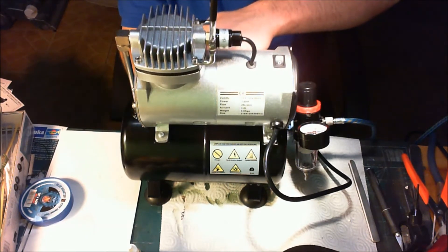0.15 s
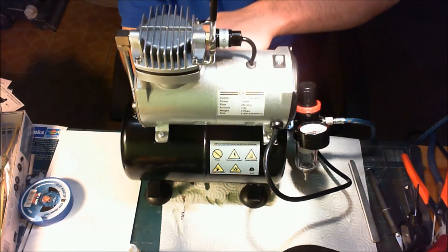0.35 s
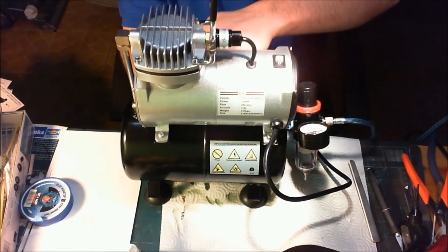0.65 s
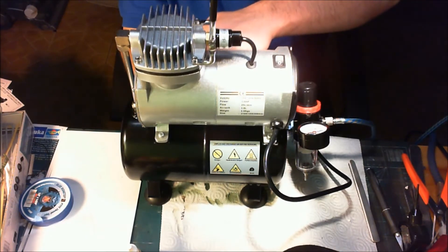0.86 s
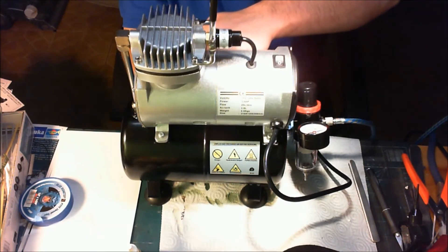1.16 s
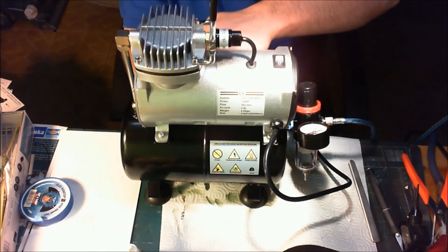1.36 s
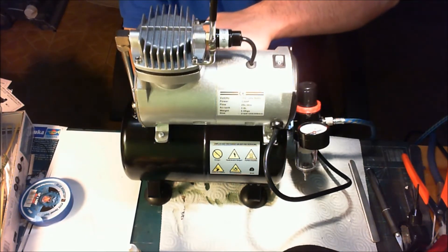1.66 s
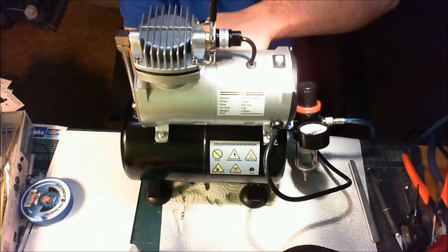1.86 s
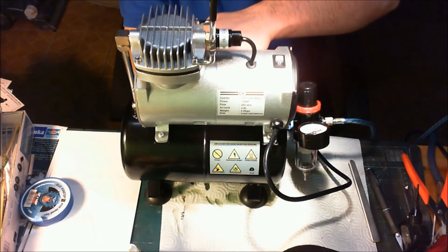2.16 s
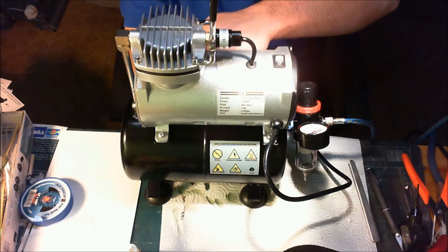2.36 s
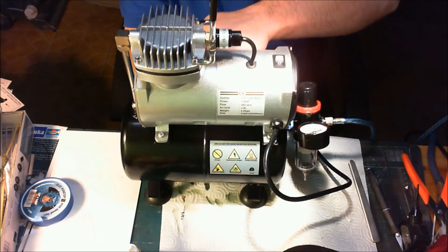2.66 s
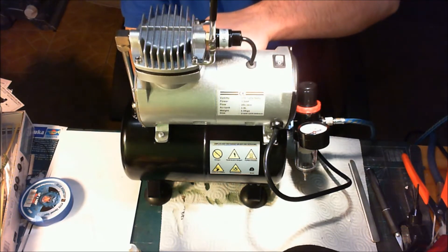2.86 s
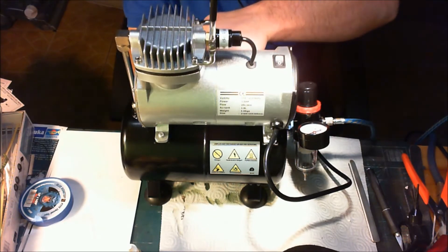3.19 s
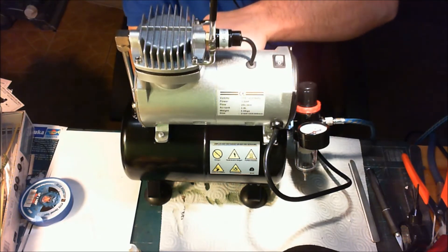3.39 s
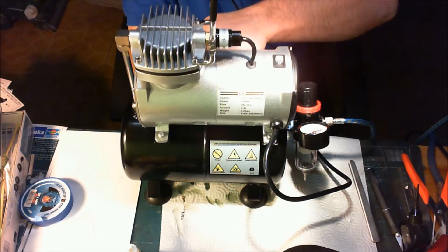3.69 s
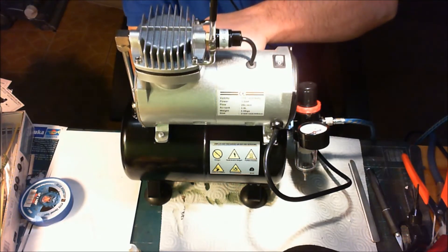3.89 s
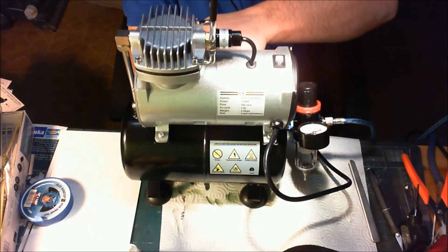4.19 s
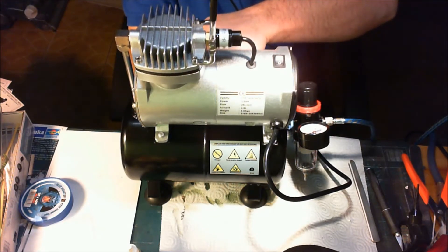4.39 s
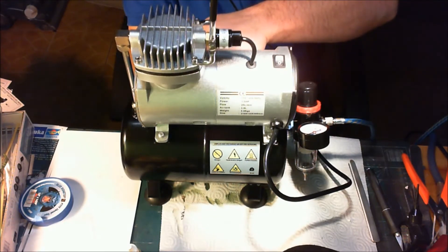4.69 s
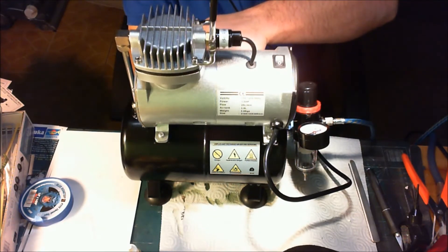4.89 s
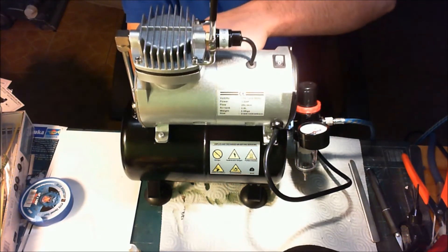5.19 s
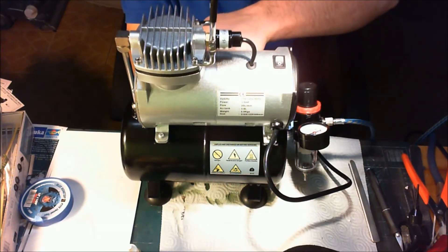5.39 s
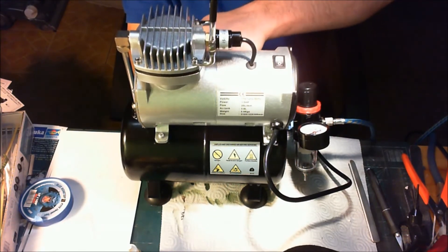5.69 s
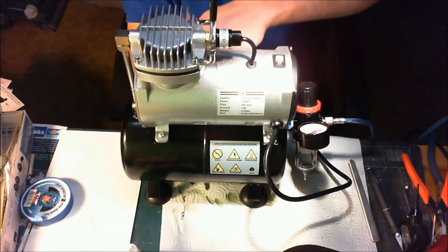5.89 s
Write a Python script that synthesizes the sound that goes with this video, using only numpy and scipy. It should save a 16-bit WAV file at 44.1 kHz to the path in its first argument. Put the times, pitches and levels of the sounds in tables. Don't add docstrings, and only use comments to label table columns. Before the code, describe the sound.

Harsh compressed air hiss bleeds from a small tank, thins and fades; a humming fan rises, a thin whistling leak, then metal clicks and two puffs.

```python
import sys
import numpy as np
from scipy import signal
from scipy.fft import rfft, irfft
from scipy.io import wavfile
from scipy.ndimage import uniform_filter1d

SR = 44100
rng = np.random.default_rng(int(sys.argv[2]) if len(sys.argv) > 2 else 0)


def put_to_file(sound):
    columns = np.atleast_2d(sound).T
    safe = np.clip(columns, -1, 1)
    whole_steps = np.round(safe * 32767)
    wavfile.write(sys.argv[1], SR, whole_steps.astype(np.int16))


def boost(x):
    u = np.asarray(x, float) / 20
    return 10 ** u


N = 266628
T = np.arange(N) / SR
HZ = np.fft.rfftfreq(N, 1 / SR) + 1e-3


def level(x, db):
    return x * boost(db) / np.sqrt(np.mean(x ** 2))


def after(s):
    return np.maximum(T - s, 0)


def walk(rate):
    k = int(SR / rate)
    steps = np.repeat(rng.standard_normal(N // k + 1), k)
    return 1.258 * uniform_filter1d(uniform_filter1d(steps, k), k)[:N]


def noise(colour, peaks=(), tilt_db=0.):
    hz, db = np.transpose(colour)
    shape = np.interp(np.log(HZ), np.log(hz), db, left=-90, right=-90)
    shape = shape + tilt_db * np.log2(HZ / 2000)
    for centre, width, lift_db in peaks:
        shape = shape + lift_db / (1 + (2 * (HZ - centre) / width) ** 2)
    return rfft(rng.standard_normal(N)) * boost(shape)


def band(spectrum, lo, hi):
    loss = np.sqrt((1 + (lo / HZ) ** 12) * (1 + (HZ / hi) ** 12))
    return level(irfft(spectrum / loss, N), 0)


def opening():
    shut_db, open_db, opens_s, tau_s = -30.5, -0.03, 3.428, 0.35
    return open_db + (shut_db - open_db) * np.exp(-after(opens_s) / tau_s)


def bleed():
    # t/s, level/dB
    flow = [(0, -37.5), (.35, -41), (.9, -43), (1.6, -45), (2.1, -48.5), (2.5, -51.5), (2.85, -56.5),
            (3.1, -62.5), (3.5, -69)]
    # f/Hz, density/dB per Hz
    jet_colour = [(30, -37), (200, -30.5), (386, -16.5), (498, -21), (666, -2.5), (743, -4.5), (959, -8),
                  (1220, -15), (1950, -8), (4680, -11.5), (7520, -9), (11700, -12.5), (12100, -14.5),
                  (15760, -15)]
    # f/Hz, width/Hz, lift/dB
    tank_modes = [(1227, 30, 11), (2010, 130, 2.5), (2870, 190, 3), (3290, 170, -9.5), (3710, 690, 5.5),
                  (4190, 220, -6), (5100, 180, 3.5), (5480, 113, 6), (6000, 250, 6), (6800, 91, -5),
                  (7060, 93, 7), (7370, 74, 3.5), (7560, 140, 6), (7870, 61, 7.5), (8330, 67, 4.5),
                  (8660, 150, -1), (11200, 220, 4.5), (13800, 500, 0)]
    # f/Hz, density/dB per Hz
    cavity_colour = [(500, -20), (580, -19), (635, -7), (668, 2.5), (715, -10), (785, -11), (860, -1.5),
                     (945, -0.5), (1010, -1), (1065, -14), (1095, -3.5), (1125, -8), (1200, -18.5),
                     (1500, -13.5)]
    # low f/Hz, high f/Hz, share/dB, lets go t/s, drop/dB
    drone_parts = [
        (400, 750, -5.5, 3.1, -9),
        (804, 2400, -3.5, 2.05, -12),
    ]
    mid_hz, high_hz, top_hz = 1300, 4500, 10000
    choked_s, unchoke_s = 1.36, 0.27
    lock_s = .22

    flow_db = np.interp(T, *np.transpose(flow), right=-120) + 1.07 * walk(5.23)
    subsonic = 1 / (1 + np.exp((choked_s - T) / unchoke_s))
    mid_db = -4 - 10 * subsonic
    top_db = -7.5 - 3.5 * subsonic

    cavity = noise(cavity_colour)
    drone = 0
    for lo, hi, share_db, s, drop_db in drone_parts:
        part_db = share_db + drop_db * np.clip(after(s) / 0.1, 0, 1)
        drone = drone + band(cavity, lo, hi) * boost(part_db)
    drone_db = -.5 - 7 * np.exp(-T / lock_s) - 2.07 * T

    jet = noise(jet_colour, tank_modes)
    hiss = drone * boost(drone_db + 1.8 * walk(9))
    hiss += band(jet, 150, 556) * boost(mid_db - 12.0 + 1.0 * walk(8.7))
    hiss += band(jet, mid_hz, high_hz) * boost(mid_db + 1.1 * walk(12))
    hiss += band(jet, high_hz, top_hz) * boost(-3.0 + 0.37 * walk(31.24))
    hiss += band(jet, top_hz, 19500) * boost(top_db + .4 * walk(7.9))

    edge_db = -43 - 21 * after(1.43) + 0.56 * walk(16.3)
    edge_tone = band(noise(jet_colour, tank_modes), 7450, 7640) * boost(edge_db)
    return boost(flow_db) * hiss + edge_tone


def leak():
    # f/Hz, density/dB per Hz
    leak_colour = [(1800, -13.5), (2600, -9.5), (3300, -14), (4600, -9), (6500, -8.5), (7500, -4.5),
                   (8500, 1), (9300, -3.5), (10000, -10), (12000, -20.5), (15760, -22)]
    # f/Hz, width/Hz, lift/dB
    valve_modes = [(3330, 130, -9), (3790, 810, 12), (4230, 200, -11), (5200, 310, 8), (5500, 90, 1),
                   (5990, 130, 3), (6000, 80, 8.5), (6600, 62, 9), (7260, 160, 7), (7760, 250, 7),
                   (8050, 183, 3.5), (8230, 100, 6.5), (8680, 130, 4.5), (9040, 110, 8.5), (9740, 150, 8),
                   (10950, 200, 6), (11650, 200, 4), (13650, 300, 7)]
    peak_s, peak_db, seep_db = 3.65, -32, -39
    on_s, off_s = 1.9, 4.98

    since = T - peak_s
    swell_db = np.maximum(peak_db + 45 * since, seep_db)
    db = np.where(since < 0, swell_db, peak_db - 11 * since)
    db = db - 9 * after(3.92) + opening()
    fizz_db = 11.5 * np.exp(-after(peak_s) / 0.55)
    mid_db = -9 + 8.5 * after(peak_s) + 0.16 * fizz_db
    top_db = -16 + fizz_db

    jet = noise(leak_colour, valve_modes)
    sink_db = np.clip(6 * (T - 3.95), -3, 1.5)
    whistle = band(jet, 6600, 7100) * boost(sink_db - 4.5)
    whistle += band(jet, 8600, 9500) * boost(-sink_db - 12.5)
    mid = band(jet, 1500, 6000) * boost(mid_db)
    top = band(jet, 11800, 17000) * boost(top_db)
    flowing = (T > on_s) * (T < off_s) * boost(db + .7 * walk(14))
    return flowing * (mid + whistle + top)


def puffs():
    # valve opens t/s, level/dB, hold/s, fall/dB a second
    bursts = [
        (5.343, -27.5, 0.062, -150),
        (5.712, -34.5, 0.044, -230),
    ]
    # f/Hz, density/dB per Hz
    puff_colour = [(1800, -17.5), (2930, -9.5), (3250, -18), (3740, -5), (4170, -15), (4440, -10.5),
                   (5770, -8.5), (6730, -12), (8210, -4.5), (9200, -9.5), (11100, -22.5), (14100, -25),
                   (15760, -26)]
    # f/Hz, width/Hz, lift/dB
    puff_modes = [(8360, 37, 4), (7630, 190, 2), (3900, 550, 2), (10960, 120, 10)]
    sing_hz, sing_end_hz, sing_tau_s = 9000, 7500, .12
    sing_width, skirt, floor_db = 0.054, .14, -8.5
    reseat_s = 0.12

    jet, out = noise(puff_colour, puff_modes), 0
    cuts = 6200 * 1.05 ** np.arange(12)
    slices = [(np.sqrt(lo * hi), band(jet, lo, hi)) for lo, hi in zip(cuts, cuts[1:])]
    for s, peak_db, hold, fall_db_s in bursts:
        db = peak_db + 800 * np.minimum(T - s, 0) - 3 * after(s)
        db = db + fall_db_s * after(s + hold) - 180 * after(s + hold + reseat_s)
        weak_db = -27 - peak_db
        mid_db = -10.5 + 4.5 * np.clip(after(s) / hold, 0, 1)
        top_db = -10.5 - 110 * after(s) - 0.54 * weak_db

        age = after(s) - 0.07 * weak_db
        pitch = sing_end_hz + (sing_hz - sing_end_hz) * np.exp(-age / sing_tau_s)
        whistle = 0
        for hz, x in slices:
            apart = np.log(hz / pitch)
            broad = boost(floor_db) * np.exp(-(np.maximum(apart, 0) / skirt) ** 2)
            whistle = whistle + x * (broad + np.exp(-(apart / sing_width) ** 2))
        mid = band(jet, 1500, 5100) * boost(mid_db)
        top = band(jet, 12400, 17000) * boost(top_db)
        out = out + boost(db + 1.1 * walk(90)) * (mid + boost(-12.0) * whistle + top)
    return out


def hand():
    # t/s, level/dB, length/s, brightness/dB an octave
    knocks = [(4.974, -33, 0.0046, -3.5), (4.982, -28.5, 0.0071, 0.8), (4.995, -45, .025, -0.5),
              (5.297, -43, .0035, 0), (5.312, -37, 0.0081, 0), (5.334, -30, 0.009, -0.5),
              (5.523, -31, 0.021, -5), (5.529, -36, 0.0094, 1.5), (5.688, -31.5, 0.013, -6.5),
              (5.858, -28, .013, -4.5), (5.864, -36, .004, -.6), (5.875, -29, 0.0043, -0.7),
              (5.896, -38, 0.033, -5)]
    # t/s, peak level/dB, f/Hz
    ticks = [(4.986, -23, 5470), (5.0933, -35.5, 5800), (5.156, -33.5, 7400), (5.5728, -32, 7900),
             (5.9374, -36.5, 7000), (6.0414, -35, 6800)]
    # f/Hz, density/dB per Hz
    metal_colour = [(450, 0), (950, 4.5), (1600, -0.5), (2800, -6), (4000, -2.5), (5800, -8), (8000, -3),
                    (10000, -14), (12000, -33)]
    # f/Hz, width/Hz, lift/dB
    body_modes = [(894, 34, 11), (1075, 65, 12.5), (1570, 180, 7), (2730, 140, 10), (3170, 68, 9),
                  (4070, 170, 5.5), (4840, 137, 6), (5650, 150, 4), (8130, 150, 3), (9050, 230, 6)]
    rise_s = .0017

    out, blows = np.zeros(N), np.zeros(N)
    for s, db, length, tilt_db in knocks:
        fall_s = .005 + 0.54 * length
        shape = np.clip((T - s) / rise_s, 0, 1) * np.exp(-after(s + rise_s + length) / fall_s)
        scrape = band(noise(metal_colour, body_modes, tilt_db), 200, 13000)
        out += boost(db + 0.97 * walk(600)) * shape * scrape
        blows[int(s * SR)] = boost(db + 2.2 * tilt_db)
    for s, db, hz in ticks:
        shape = (T >= s) * np.exp(-after(s) / 0.0036)
        out += boost(db - 6) * shape * band(noise(metal_colour), hz * 1.04, hz * 1.07)
        blows[int(s * SR)] = boost(db - 9)
    return out + ring(blows)


def ring(blows):
    # f/Hz, level/dB, t60/s
    ring_modes = [(6570, -25, 0.4), (5800, -15, 0.11), (1590, -33, .15)]
    t = T[:SR // 4]
    modes = sum(boost(db - 60 * t / t60) * np.sin(2 * np.pi * hz * t) for hz, db, t60 in ring_modes)
    return signal.fftconvolve(blows, modes)[:N]


def bench(x):
    echo_db, echo_t60_s = -11, .09
    t = T[1:SR // 10]
    high_pass = signal.butter(2, 2500, "high", fs=SR, output="sos")
    treble = signal.sosfilt(high_pass, rng.standard_normal(len(t)))
    echoes = level(treble * boost(-60 * t / echo_t60_s), echo_db) / np.sqrt(len(t))
    return signal.fftconvolve(x, np.r_[1, echoes])[:N] / np.sqrt(1 + boost(2 * echo_db))


def buffet():
    db = -69.5 - 110 * after(0.35)
    flutter = noise([(20, 9), (60, 2), (250, -7)])
    return band(flutter, 29.7, 220) * boost(db + 2.3 * walk(16))


def room():
    # f/Hz, density/dB per Hz
    room_colour = [(15, -38), (30, -17.5), (60, -17.5), (119, -22), (300, -20.5), (705, -14), (898, -17),
                   (1110, -15), (1210, -19), (2710, -37.5), (5760, -42.5), (6410, -39.5), (8400, -46.5),
                   (15760, -43.5)]
    # f/Hz, width/Hz, lift/dB
    room_modes = [(60, 11, 1), (130, 8.5, 4), (190, 63, 4), (383.3, 10.5, 11), (680, 120, -2),
                  (770, 7.3, 7.5), (920, 40, 7), (1264, 85, 4)]
    # multiple of the blade rate, level/dB
    blades = [(2, -53.5), (3, -75), (4, -46.5), (5, -46.5)]
    blade_hz = 219.1

    air, octaves = noise(room_colour, room_modes), 20 * 2. ** np.arange(11)
    rush = 0
    for lo, hi in zip(octaves, octaves[1:]):
        rush = rush + irfft(air * ((HZ > lo) & (HZ <= hi)), N) * boost(.9 * walk(8))
    turn = 2 * np.pi * np.cumsum(blade_hz * (1 + 0.002084 * walk(5))) / SR
    tones = sum(np.sqrt(2) * boost(db + 1.8 * walk(14)) * np.sin(k * turn) for k, db in blades)
    return level(rush, -35.5) + tones


def widen(mono):
    # centre t/s, low f/Hz, high f/Hz
    wide_patches = [(.045, 7500, 9000), (.045, 11000, 12500), (.232, 14500, 15700), (.3, 6200, 9000),
                    (.533, 11700, 13200), (.65, 4600, 6300), (.882, 13100, 15700), (1.903, 10300, 11800),
                    (1.903, 12400, 13800), (2.69, 6900, 8300), (2.715, 8300, 10400), (2.925, 9700, 11100),
                    (3.25, 5700, 6900), (3.25, 11800, 13800), (4.108, 4600, 5700), (4.108, 13100, 14500),
                    (4.643, 12400, 13800)]
    side, size = np.zeros(N), 2048
    hz = np.fft.rfftfreq(size, 1 / SR)
    window = np.sin(np.pi * np.arange(size) / size) ** 2
    for s, lo, hi in wide_patches:
        cut = slice(int(s * SR) - size // 2, int(s * SR) + size // 2)
        strength = np.abs(rfft(mono[cut])) * ((hz > lo) & (hz < hi))
        patch = strength * np.exp(2j * np.pi * rng.random(len(hz)))
        side[cut] += boost(-2.5) * irfft(patch) * window
    return side


def scene():
    offset = -.039
    close = bench(bleed() + leak() + puffs() + hand())
    mono = close + buffet() + boost(opening()) * (room() + offset)
    return np.array([mono, mono])


def roll_off(x):
    return signal.sosfilt(signal.butter(12, 16670, fs=SR, output="sos"), x)


def record(dry):
    side = widen(dry[0])
    return roll_off(dry + np.array([side, -side]))


dry = scene()
out = record(dry)
put_to_file(out)
```